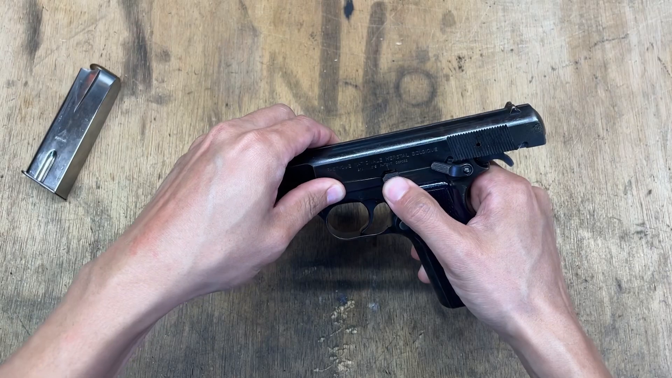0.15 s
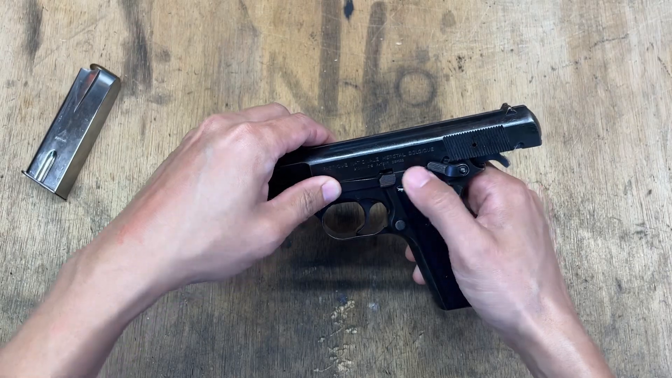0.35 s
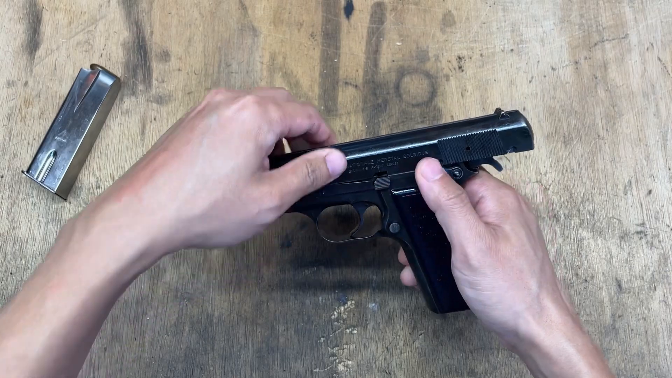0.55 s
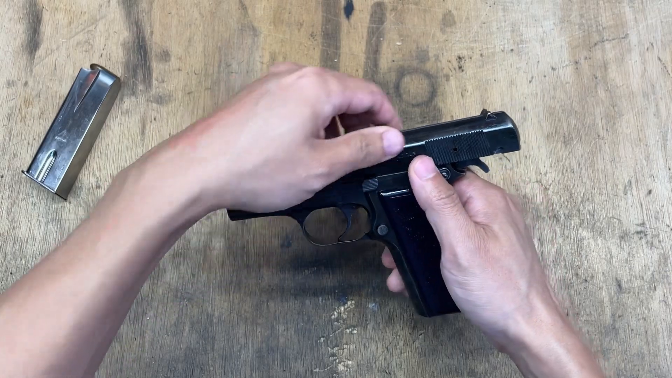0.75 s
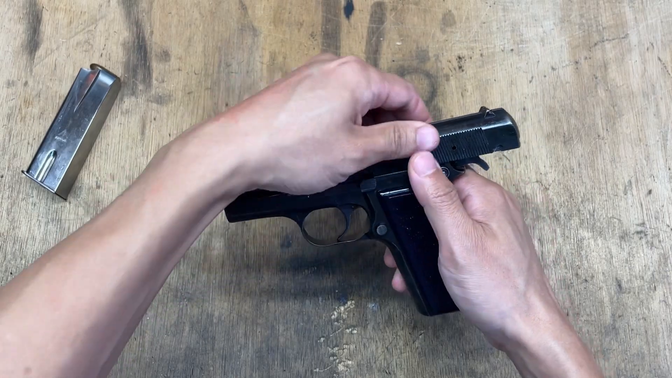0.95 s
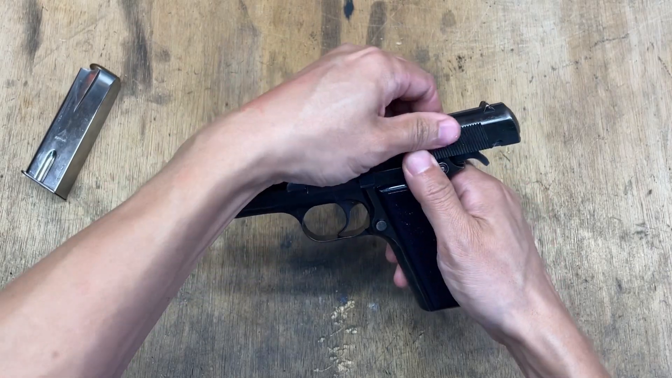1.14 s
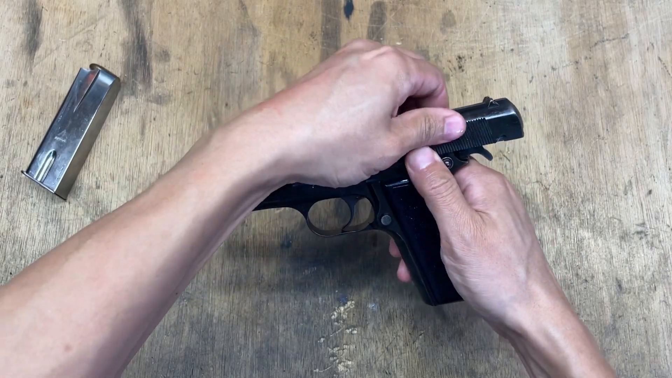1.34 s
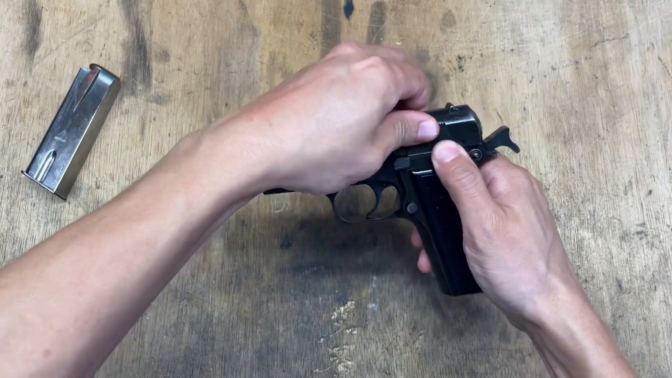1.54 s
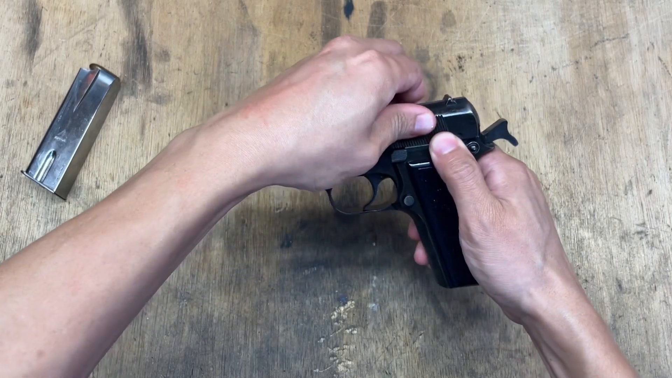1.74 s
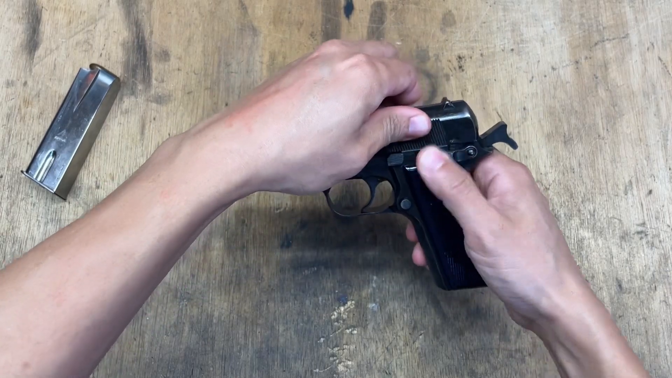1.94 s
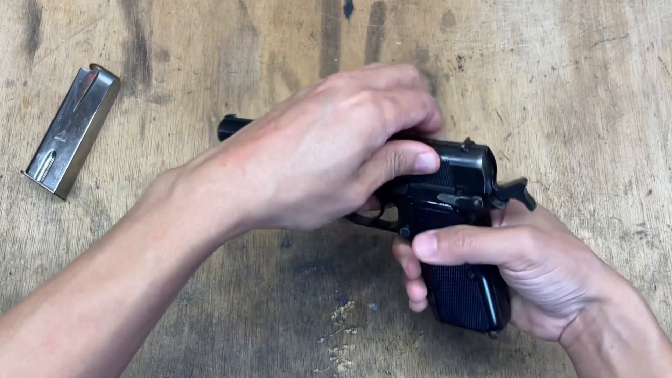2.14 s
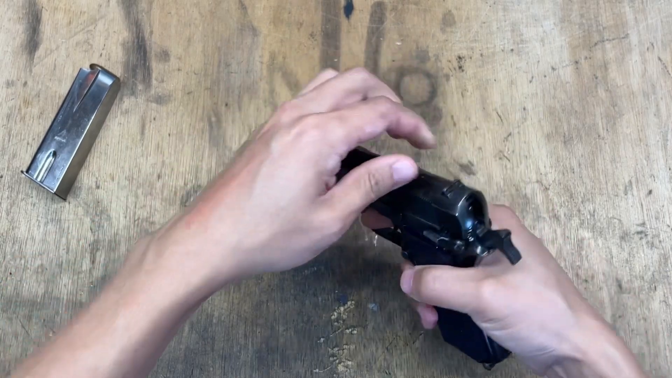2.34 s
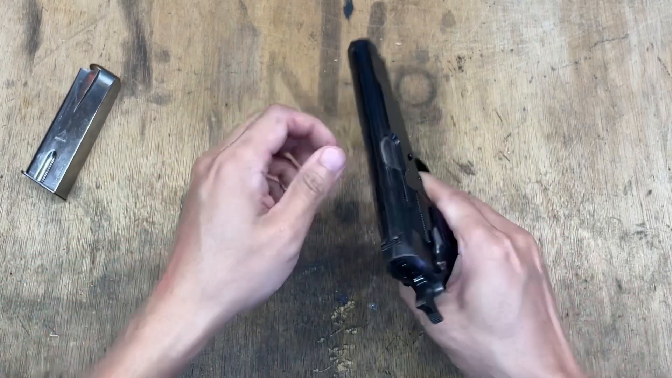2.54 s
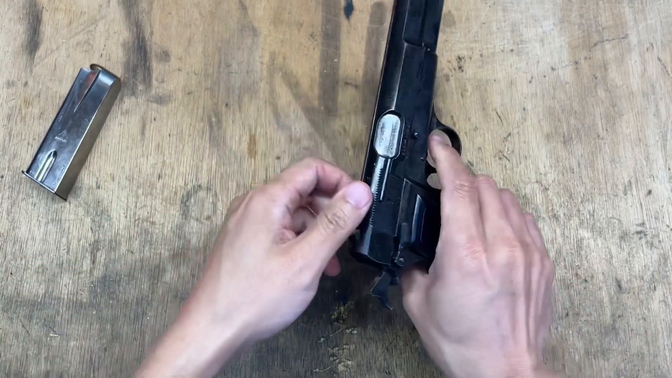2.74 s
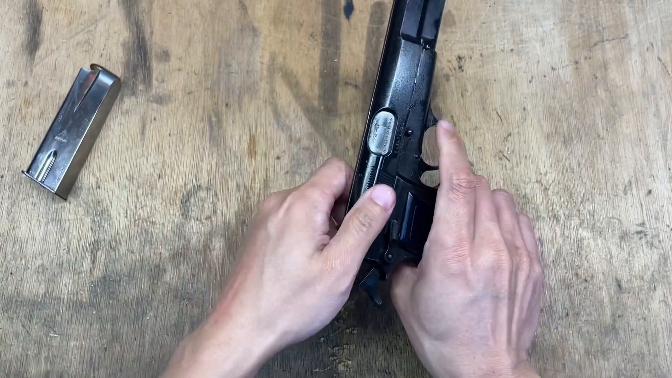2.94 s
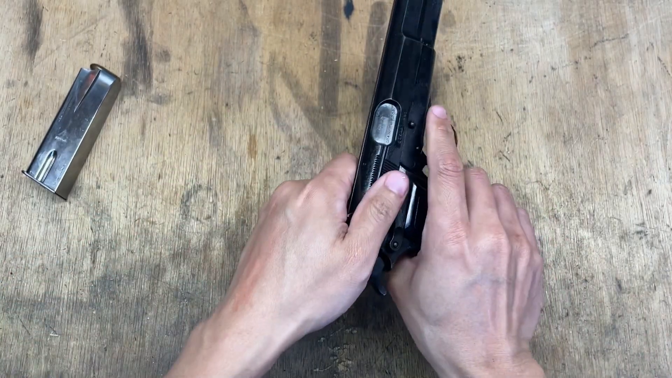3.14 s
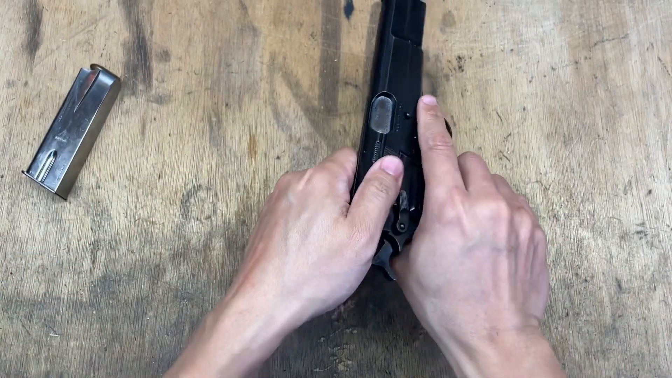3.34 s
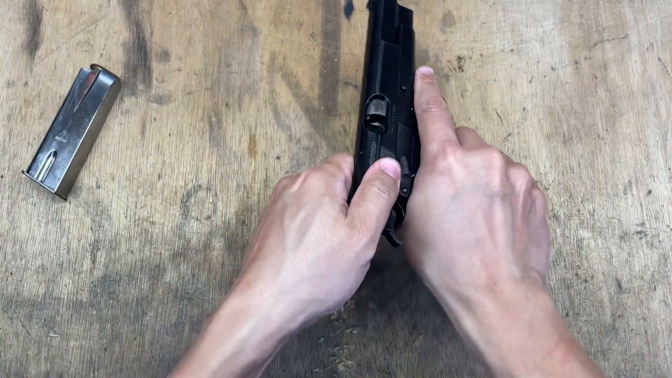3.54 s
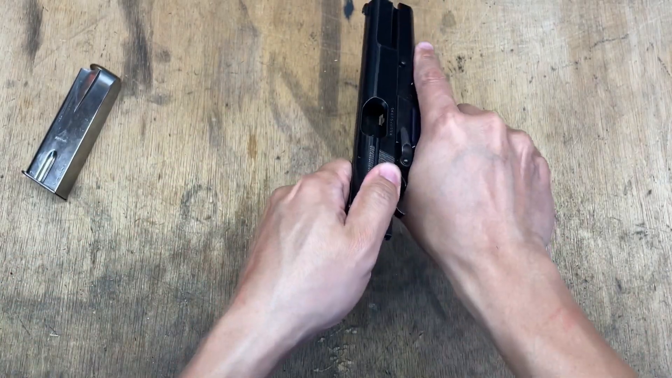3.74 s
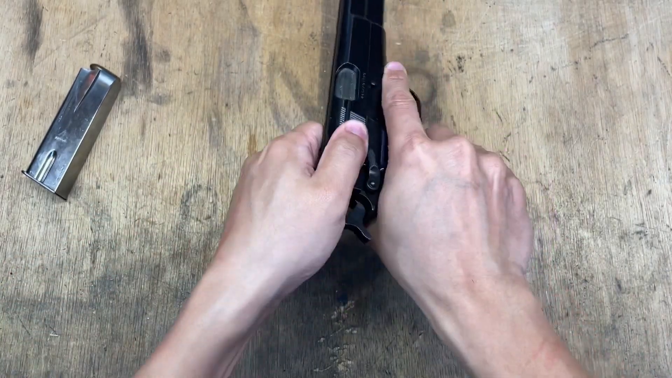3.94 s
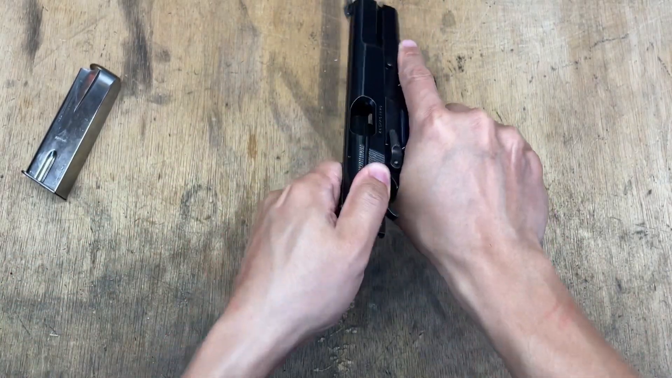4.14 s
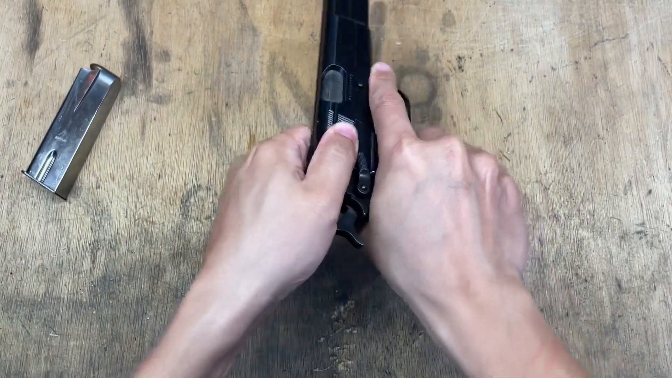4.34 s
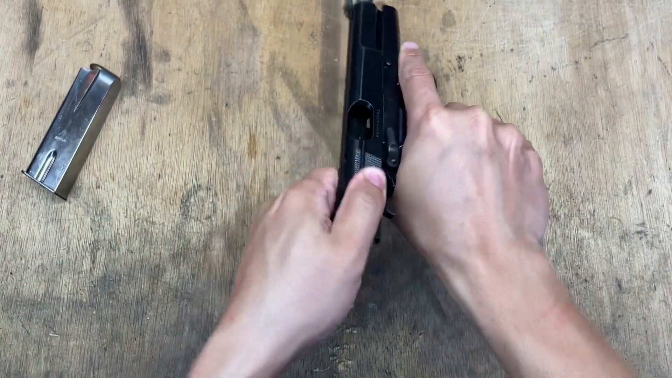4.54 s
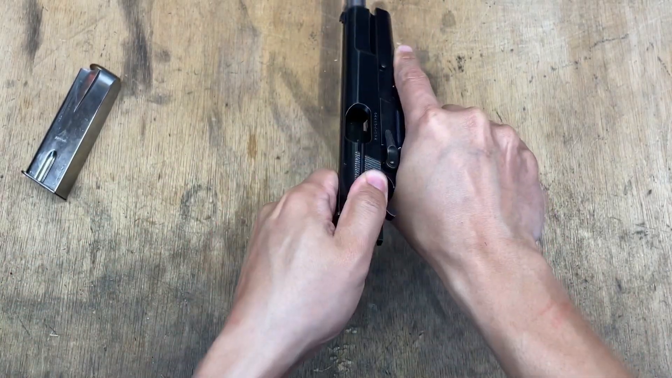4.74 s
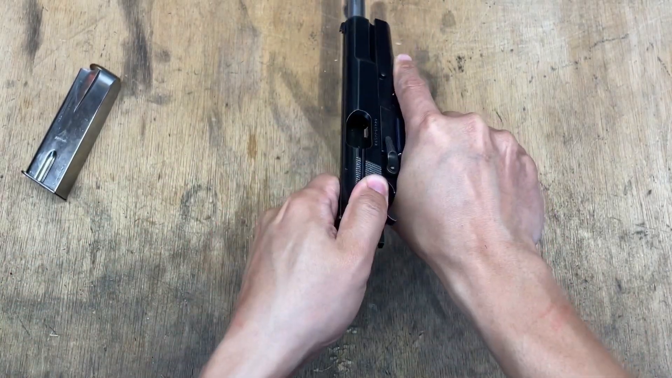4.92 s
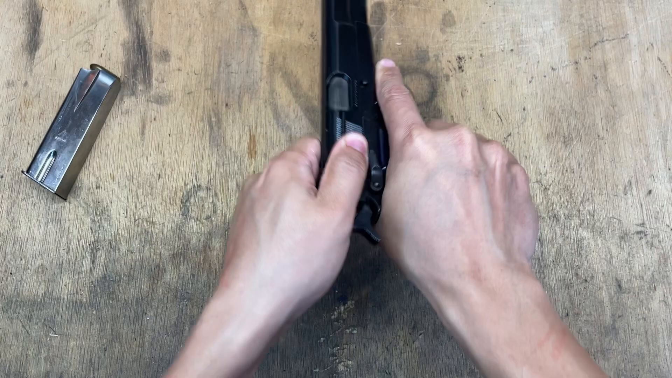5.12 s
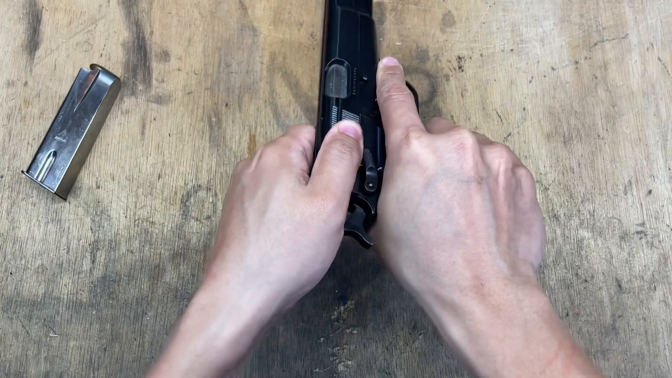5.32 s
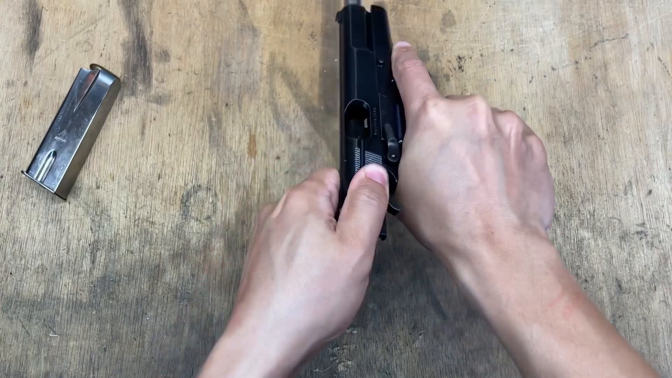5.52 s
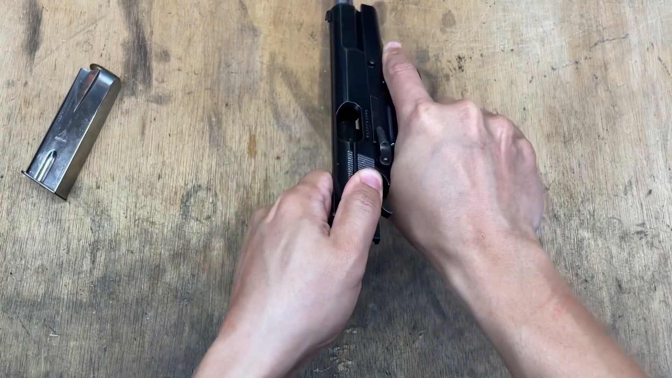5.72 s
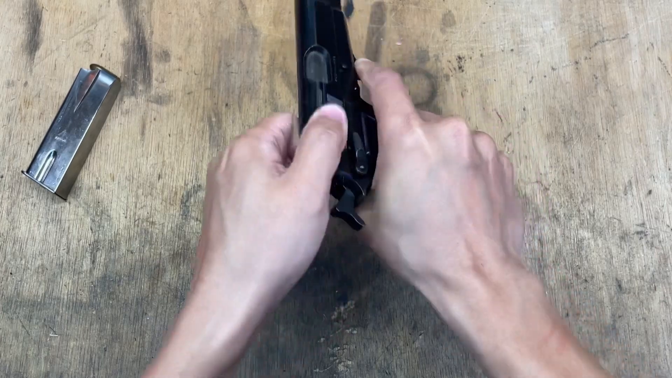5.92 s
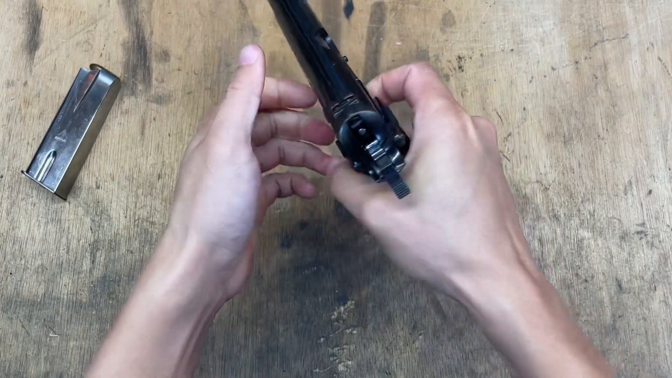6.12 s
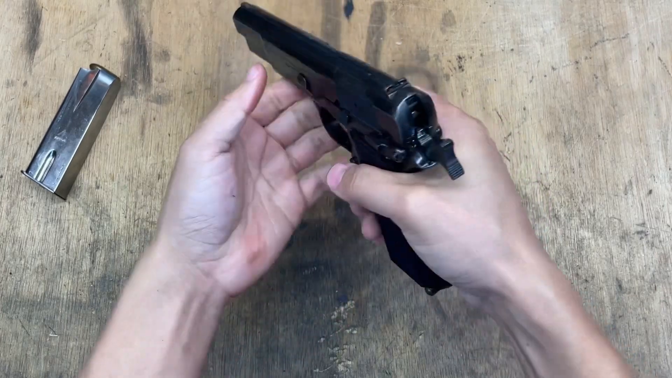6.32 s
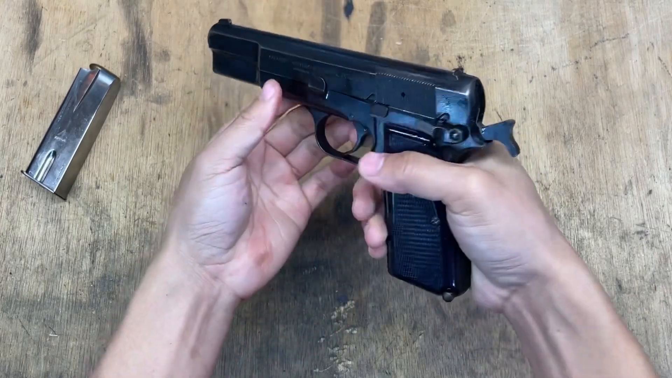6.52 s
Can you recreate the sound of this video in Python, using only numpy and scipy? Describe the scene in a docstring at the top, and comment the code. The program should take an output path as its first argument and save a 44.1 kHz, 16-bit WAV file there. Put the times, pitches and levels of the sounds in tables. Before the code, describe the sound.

A close stereo perspective in a small room, with soft low rumble and faint steady hiss throughout. The first 1.3 seconds are nearly quiet, with barely audible rubbing. At about 1.37 a hollow hammer clack snaps, and at 1.4 a pistol slide slams very loudly, with a dull low knock and a shimmering spring ring fading into a short room tail. Only tiny ticks and faint scrapes follow until 3.4. Then the slide is racked four times: drawn back with quick clicks at 3.45, 4.07, 4.48 and 5.41, and slammed forward at 3.88, 4.33, 5.15 and 5.88, each after a very short rising scrape. The first rack is slower and softer, the second the loudest, the others bright and hard. Extra sharp clicks land at 4.56 and 5.5. After the last slam the ring dies away and quiet rumble remains until about 6.7.

```python
"""Sharp steel clicks, scrapes and ringing slams, close up in a small room, over a low rumble and faint hiss.
A pistol is worked by hand over a wooden bench: the hammer snaps, the slide slams, then is racked four times.
Each rack is three clicks as the slide is drawn back, a rising scrape as it runs forward, and a slam.
Contacts are noise bursts through frame resonances, rubbing is a run of random slips, and the recoil spring
is a cluster of beating decaying sines. A noise tail is the room; a limiter turns down the strongest blows."""
import sys
import numpy as np
from scipy import signal
from scipy.fft import rfft, irfft
from scipy.io import wavfile
from scipy.ndimage import uniform_filter1d, minimum_filter1d

SR = 44100
rng = np.random.default_rng(int(sys.argv[2]) if len(sys.argv) > 2 else 0)


def to_wav(s):
    """Save 16-bit WAV."""
    ch = np.atleast_2d(s).T  # columns
    pcm = np.round(np.clip(ch, -1, 1) * 32767)  # PCM
    wavfile.write(sys.argv[1], SR, pcm.astype(np.int16))


N = 294147
TIME_S = np.arange(N) / SR
HIT = 8192  # samples in one contact
AGE_S = np.arange(HIT) / SR

# slide slamming against its stop: (time [s], level [dB], 1.3 kHz body [dB], 5 kHz ring [dB], 9 kHz edge [dB], #
# spring level [dB], lift of spring modes below 5 kHz [dB], thump level [dB], lead of the double tick [s], #
# final glide level [dB], final rush level [dB])
SLAMS = [(1.4044, -2, -3.5, -1.5, 3.5, -21.5, -8, -17, 0.033, -74, -35),
         (3.8792, -13, -4.5, -1, -3, -44.5, -4.5, -58, 0.034, -52.5, -41.5),
         (4.3342, -3, 2, 3, 3, -37, 3.5, -34.5, 0.024, -55, -33),
         (5.1466, -8, -1, 2.5, 1, -30, 9.5, -41, .0315, -59.5, -30.5),
         (5.8773, -6, -2, -4, 0.5, -43, 4, -30.5, .0215, -54.5, -25.5)]
# spectrum of a light steel contact: (frequency [Hz], gain [dB])
CLICK_COLOUR = [(200, -19), (400, -8.5), (700, -8), (1100, -2.5), (2400, 1), (5400, -1), (6800, -3.5),
                (8500, -4), (11500, -27.5), (15000, -9.5), (16500, -31.5)]


def undb(db):
    """Decibels to an amplitude factor."""
    return 10 ** (np.asarray(db) / 20)


def level(x, db):
    """Scale a hit so that its channel-mean energy, spread over 10 ms, has this level."""
    energy = np.mean(np.sum(x ** 2, axis=-1))
    return x * undb(db) / np.sqrt(energy / (SR / 100))


def along(points, size):
    """A table of (Hz, value) read on a log frequency axis at every bin of a transform."""
    hz, value = np.transpose(points)
    bins_hz = np.fft.rfftfreq(size, 1 / SR)
    return np.interp(np.log(bins_hz + 1), np.log(hz), value)


def colour(x, db):
    """Minimum-phase filter, via the folded cepstrum, with the given gain at every bin."""
    size = x.shape[-1]
    cepstrum = irfft(np.log(undb(db)), size)
    cepstrum[1:size // 2] *= 2
    cepstrum[size // 2 + 1:] = 0
    return irfft(rfft(x) * np.exp(rfft(cepstrum)), size)


def add(out, s, x):
    """Mix a sound in at time s."""
    i = max(int(s * SR), 0)
    out[:, i:i + x.shape[-1]] += x[..., :max(N - i, 0)]


def stereo_noise(size, side):
    """Noise shared by both channels, plus a part in opposite polarity."""
    shared, apart = rng.standard_normal((2, size))
    return shared + side * apart * np.array([[1], [-1]])


def background():
    """A low rumble that swells and sinks, under a faint steady hiss."""
    # background spectrum: (frequency [Hz], relative density [dB per Hz])
    air_spectrum = [(20, -15), (32, -7.5), (42, -11), (54, 9), (68, -8), (130, -8.5), (165, -16.5),
                    (270, -12), (400, -22.5), (680, -32.5), (1000, -47), (2000, -54), (5600, -57.5),
                    (6400, -50.5), (7500, -61.5), (16000, -71)]
    # rumble level: (time [s], level [dB])
    rumble_level = [(0.0, -53.5), (1.24, -53.5), (1.47, -60), (2.13, -60.5), (2.89, -54.5), (4.15, -52.5),
                    (4.27, -53), (4.92, -58), (5.64, -54), (5.99, -60.5), (6.31, -62), (6.66, -55.5)]
    hz = np.fft.rfftfreq(N, 1 / SR)
    mid, side = rfft(rng.standard_normal((2, N))) * undb(along(air_spectrum, N))
    width = np.minimum(hz / 1000, .8)  # bass stays in the middle
    air = (mid + width * side * np.array([[1], [-1]])) / irfft(mid, N).std()
    low = 1 / (1 + (hz / 700) ** 2)
    swell = undb(np.interp(TIME_S, *np.transpose(rumble_level)))
    rumble = swell * irfft(air * low, N)
    hiss = undb(-52.5) * irfft(air * (1 - low), N)
    return rumble + hiss


def room(x, wet_db, build_s):
    """Bench and walls answer with a diffuse tail that lasts longest in the bass and shortest in the top."""
    # echo bands: (centre [Hz], level [dB], t60 [s])
    echo_bands = [(150, -16.5, 0.96), (770, -2, 0.52), (1500, -7.5, .44), (2300, -1.5, 0.47),
                  (3500, -4, 0.51), (6600, -3, 0.51), (9400, -6, .44), (11100, -14.5, 0.16),
                  (15500, -7, .34)]
    t = np.arange(SR) / SR
    noise = rfft(rng.standard_normal((2, SR)))
    tail = 0
    for k, (_, db, t60_s) in enumerate(echo_bands):
        band = along([(row[0], j == k) for j, row in enumerate(echo_bands)], SR)
        tail = tail + irfft(noise * band, SR) * undb(db - 60 * t / t60_s)
    early = 1 + 2.3 * np.exp(-t / 0.019)  # near surfaces answer first
    build = 1 - np.exp(-(t / build_s) ** 2)
    tail = tail * early * build / np.sqrt(SR / 25)
    return undb(wet_db) * signal.fftconvolve(x, tail, axes=1)[:, :N]


def contact(rise_s, crack_s, chatter_s, chatter_db):
    """Steel meets steel: a crack, then a longer chatter of the loose parts, damped by the hands."""
    crack = np.exp(-AGE_S / crack_s) * stereo_noise(HIT, side=0.17)
    chatter = undb(chatter_db) * np.exp(-AGE_S / chatter_s) * stereo_noise(HIT, side=0.49)
    return (1 - np.exp(-(AGE_S / rise_s) ** 2)) * (crack + chatter)


def steel(push, spectrum, body_db, ring_db, edge_db):
    """A push heard through the frame's resonances; the place of contact sets its tone."""
    # resonances of frame and slide: (frequency [Hz], width [Hz], lift before scatter [dB])
    frame_modes = [(1014, 77, 4.5), (1295, 30, 1.5), (1970, 88, 1), (2220, 250, 3), (2510, 32, 3),
                   (2570, 50, 3), (2750, 73, 2.5), (2957, 52, 5.5), (3395, 71, 7.5), (3836, 83, 8.5),
                   (4330, 70, 1.5), (4620, 200, 8), (4900, 60, 6), (5060, 190, 4), (5190, 280, 5.5),
                   (5380, 100, 2.5), (6390, 44, 8.5), (7000, 86, 3.5), (8830, 120, 6)]
    hz = np.fft.rfftfreq(HIT, 1 / SR)
    shares = 0.65 + .3 * rng.uniform(-0.36, 1, len(frame_modes))  # every contact excites them differently
    resonances = 0
    for share, (mode_hz, width_hz, lift_db) in zip(shares, frame_modes):
        resonances = resonances + share * lift_db / (1 + (2 * (hz - mode_hz) / width_hz) ** 2)
    tone = along([(1300, body_db), (2500, 0.0086), (5000, ring_db), (9000, edge_db)], HIT)
    small_body = 20 * np.log10((hz + 1) / (hz + 120))  # a small object radiates little bass
    lag_s = .0011 * np.sqrt(1000 / (hz + 100))  # low bending waves travel slower, so the lows arrive last
    phase = 2 * np.pi * np.cumsum(lag_s - lag_s[-1]) * SR / HIT
    bent = irfft(rfft(push) * np.exp(-1j * phase), HIT)
    return colour(bent, along(spectrum, HIT) + resonances + tone + small_body)


def click(out_db, body_db, ring_db, edge_db, brightness_db=0):
    """One light catch of steel on steel; a harder edge lifts the treble."""
    push = contact(rise_s=.0006, crack_s=0.001, chatter_s=0.0068, chatter_db=-12.5)
    sound = steel(push, CLICK_COLOUR, body_db, ring_db + brightness_db, edge_db + brightness_db)
    return level(sound, out_db)


def rubbing(length_s, end_db, rise_db, scrape_hz, taper):
    """Rough steel slides on steel: a dense run of tiny unequal slips rings the part being pushed."""
    slips_per_s, waver_db, waver_per_s = 4000, 1.7, 70
    scrape_db, sag_hz_per_s = -5, 3200  # the scraping resonance sinks during the stroke
    size = max(int(length_s * SR), 256)
    t = np.arange(size) / SR
    strength = undb(3.2 * rng.exponential(size=size).clip(0, 4.5))
    slips = (rng.random(size) < slips_per_s / SR) * strength
    smeared = signal.lfilter([1], [1, -np.exp(-1 / (0.001 * SR))], slips)  # each slip dies in about 1 ms
    grit = smeared * stereo_noise(size, side=0.13)
    pitch_hz = scrape_hz - sag_hz_per_s * t
    lowpass = signal.butter(2, 220, fs=SR, output="sos")
    scrape = signal.sosfilt(lowpass, grit) * np.sin(2 * np.pi * np.cumsum(pitch_hz) / SR)
    grit = colour(grit, along(CLICK_COLOUR, size))
    sound = grit / (grit.std() + 1e-9) + undb(scrape_db) * scrape / (scrape.std() + 1e-9)
    pressure_db = waver_db * np.interp(t * waver_per_s, np.arange(64), rng.standard_normal(64))
    ramp_db = np.linspace(end_db - rise_db, end_db, size)
    return sound * undb(ramp_db + pressure_db) * signal.windows.tukey(size, taper)


def handling():
    """Single clicks and slow fading scrapes as loose parts, slide and grip shift."""
    # clicks, from loose parts up to the slide meeting its rear stop: (time [s], level [dB], brightness [dB])
    single_clicks = [(1.303, -74, 3.5), (1.393, -32.5, -2), (1.559, -44, -2), (2.021, -75, -9),
                     (2.11, -77, 19), (3.427, -54.5, -9), (3.5872, -50.5, -2), (3.593, -51.5, 1),
                     (3.779, -61.5, -2.5), (3.897, -34.5, 2), (4.564, -19.5, 7), (5.5012, -24.5, 1),
                     (5.772, -65.5, 6.5)]
    # slide eased along or grip shifting: (time [s], length [s], end level before taper [dB], start pitch [Hz])
    slow_scrapes = [(0.982, 0.053, -83.5, 1897), (1.075, 0.038, -84.5, 1691), (1.359, 0.042, -44, 1550),
                    (1.941, .17, -77, 3150), (2.091, 0.18, -79.5, 2700), (3.28, 0.036, -81.5, 1500),
                    (3.434, 0.15, -60.5, 3600), (3.592, 0.094, -56, 2101), (4.938, 0.16, -87, 2356)]
    out = np.zeros((2, N))
    for s, db, brightness_db in single_clicks:
        add(out, s, click(db, body_db=4.5, ring_db=0, edge_db=-2, brightness_db=brightness_db))
    for s, length_s, db, scrape_hz in slow_scrapes:
        add(out, s, rubbing(length_s, db, rise_db=-3, scrape_hz=scrape_hz, taper=1.0))
    return out


def hammer():
    """The hammer snaps over the sear: a hollow clack of decaying modes with a small steel tick on top."""
    # hammer modes: (frequency [Hz], level [dB], t60 [s])
    hammer_modes = [(1174.6, -5, .016), (1260, 4.5, 0.019), (1560, 1.5, 0.027), (2350, -5.5, .025),
                    (4900, -11, 0.045), (6550, -21, .03)]
    out = np.zeros((2, N))
    clack = 0
    for hz, db, t60_s in hammer_modes:
        clack = clack + undb(db - 60 * AGE_S / t60_s) * np.sin(2 * np.pi * hz * AGE_S)
    clack = clack * (1 - np.exp(-(AGE_S / 0.00066) ** 2))
    clack = signal.sosfilt(signal.butter(4, 950, "high", fs=SR, output="sos"), clack)
    push = contact(rise_s=0.00032, crack_s=0.00069, chatter_s=.008, chatter_db=-12.5)
    tick = steel(push, CLICK_COLOUR, body_db=-0.5, ring_db=-4.5, edge_db=1.5)
    add(out, 1.3749, level(clack, -23) + level(tick, -29))
    return out


def pulls():
    """Each pull is three clicks: the lugs unlock, the barrel drops, the slide rides onto the hammer."""
    # slide drawn back: (time [s], barrel drop level [dB], brightness of first two clicks [dB],
    # barrel drop delay [s], hammer delay [s], hammer level [dB], hammer 1.3 kHz body [dB])
    slide_pulls = [(3.4462, -34.5, -10.5, .0119, .063, -29, 6), (4.0652, -24, 0, .0087, .0354, -22.5, -0.5),
                   (4.4849, -23, -1, .0094, .0316, -22.5, 1), (5.407, -26, -1.5, .0104, .0368, -23, 2.5)]
    unlock_db = -6.5  # against the drop of the barrel
    out = np.zeros((2, N))
    for s, db, brightness_db, drop_s, cock_s, cock_db, body_db in slide_pulls:
        unlock = click(db + unlock_db, body_db=2.5, ring_db=3.5, edge_db=-5.5, brightness_db=brightness_db)
        drop = click(db, body_db=-3.5, ring_db=1, edge_db=-2.5, brightness_db=brightness_db)
        add(out, s, unlock)
        add(out, s + drop_s, drop)
        add(out, s + cock_s, click(cock_db, body_db, ring_db=-.5, edge_db=-4))
    return out


def run_ups():
    """Before each slam the slide glides ever louder, ticks twice and rushes into its stop."""
    glide_s, second_tick_delay_s = .088, .0052
    out = np.zeros((2, N))
    for s, *_, lead_s, glide_db, rush_db in SLAMS:
        first_tick_s = s - lead_s
        glide = rubbing(glide_s, glide_db, rise_db=19.5, scrape_hz=2330, taper=.15)
        add(out, first_tick_s - glide_s, glide)
        add(out, first_tick_s, click(-40.5, body_db=0, ring_db=7, edge_db=5))
        add(out, first_tick_s + second_tick_delay_s, click(-41, body_db=11, ring_db=4, edge_db=-7))
        rush = rubbing(lead_s + 0.0043, rush_db, rise_db=22.5, scrape_hz=4580, taper=.15)
        add(out, first_tick_s, rush)
    return out


def spring(low_db, count):
    """Many close coil modes of the recoil spring beat against each other in a short metallic shimmer."""
    # clusters of coil modes: (centre [Hz], spread [Hz], level [dB], t60 [s])
    coil_clusters = [(2110, 70, -18, .5), (2600, 110, -15, 0.45), (4648, 70, -3, .62),
                     (5235, 200, 2.5, 0.56), (5950, 260, -12.5, 0.93), (8800, 160, -11, .45)]
    modes = []
    for hz, spread_hz, db, t60_s in coil_clusters:
        for k in rng.standard_normal(count):
            modes.append((hz + spread_hz * k, db + low_db * (hz < 5000), t60_s))
    phases = np.exp(2j * np.pi * rng.random((2, len(modes))))  # differ between the channels
    t = np.arange(SR // 2 + HIT) / SR
    waves = [undb(db - 60 * t / t60_s) * np.exp(2j * np.pi * hz * t) for hz, db, t60_s in modes]
    return (phases @ waves).imag


def thump(start_hz, end_hz, fall_s, rise_s, decay_s):
    """The heavy frame jolts in the grip: a dull knock whose pitch sinks as the hand gives way."""
    hz = end_hz + (start_hz - end_hz) * np.exp(-AGE_S / fall_s)
    envelope = (1 - np.exp(-AGE_S / rise_s)) * np.exp(-AGE_S / decay_s)
    return np.sin(2 * np.pi * np.cumsum(hz) / SR) * envelope


def slams():
    """The slide hits its stop and rebounds; the frame jolts and thumps into the hand, the spring sings on."""
    # spectrum of a hard steel contact: (frequency [Hz], gain [dB])
    slam_colour = [(200, -10.5), (400, -11), (650, -17.5), (1000, -6.5), (1500, -6.5), (2600, -1.5),
                   (3300, -5.5), (5000, -1), (6600, -1), (7600, -8), (8800, -0.5), (11500, -14.5),
                   (14800, -4), (16500, -15.5)]
    rebound_s = .0033
    out = np.zeros((2, N))
    for s, db, body_db, ring_db, edge_db, spring_db, low_db, thump_db, *_ in SLAMS:
        blow = contact(rise_s=.0005, crack_s=0.0019, chatter_s=0.0067, chatter_db=-6.5)
        rebound = contact(rise_s=0.0015, crack_s=.0012, chatter_s=.006, chatter_db=-10.5)
        push = blow + undb(-2.0) * np.roll(rebound, int(rebound_s * SR))
        add(out, s, level(steel(push, slam_colour, body_db, ring_db, edge_db), db))
        # later and duller than the blow
        jolt = contact(rise_s=0.0014, crack_s=0.0067, chatter_s=0.013, chatter_db=-10.5)
        jolt = steel(jolt, slam_colour, body_db + 7.5, ring_db=-3.0, edge_db=-9)
        add(out, s + .007, level(jolt, db - 15.5))
        add(out, s, level(spring(low_db, count=24), spring_db))
        knock = thump(start_hz=370, end_hz=53.6, fall_s=0.005, rise_s=0.0029, decay_s=0.0092)
        add(out, s + 0.0028, level(knock, thump_db))
    return out


def scene():
    """The pistol, its room echo and the background."""
    pistol = pulls() + run_ups() + slams() + hammer() + handling()
    return pistol + room(pistol, wet_db=-12.5, build_s=0.002) + background()


def limiter(x, ceiling_db, release_db_per_s):
    """Follows power over 3 ms, turns down just ahead of loud blows, recovers slowly; stray peaks clip."""
    power = np.abs(uniform_filter1d(np.mean(x ** 2, axis=0), size=133))
    over_db = np.maximum(10 * np.log10(power + 1e-12) - ceiling_db, 0)
    release_db = release_db_per_s * TIME_S
    cut_db = np.maximum.accumulate(over_db + release_db) - release_db
    gain_db = uniform_filter1d(minimum_filter1d(-cut_db, size=129), size=129)
    return np.clip(x * undb(gain_db), -.82, .82)


def record(dry):
    """Two ports out of phase in the treble move it to the sides; then limiter, low cut and steep top cut."""
    # phase between the two microphone ports: (frequency [Hz], phase [rad])
    port_phase = [(400, .05), (1000, .1), (2000, 0.25), (4400, 0.71), (6500, 1.3), (9000, 2.674),
                  (15000, 2.6)]
    left, right = rfft(dry)
    turn = along(port_phase, N) / 2
    mid = (left + right) / 2 * np.cos(turn)
    side = (left + right) / 2 * 1j * np.sin(turn) + (left - right) / 2
    heard = limiter(irfft([mid + side, mid - side], N), ceiling_db=-10.5, release_db_per_s=51)
    heard = signal.sosfilt(signal.butter(4, 27, "high", fs=SR, output="sos"), heard)
    return signal.sosfilt(signal.ellip(8, .2, 70, 16600, fs=SR, output="sos"), heard)


dry = scene()
out = record(dry)
to_wav(out)
```